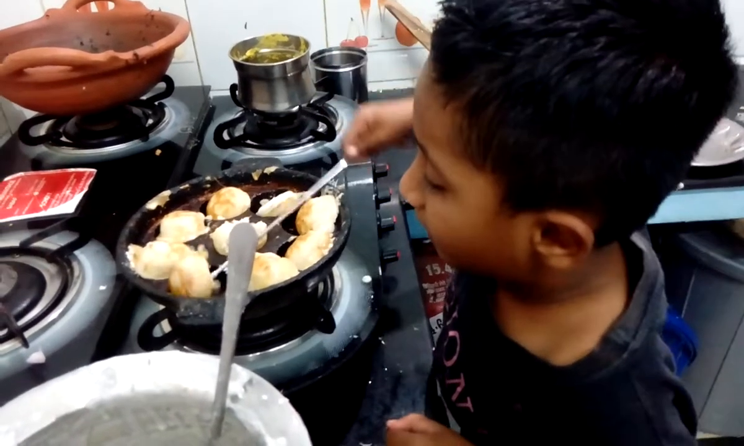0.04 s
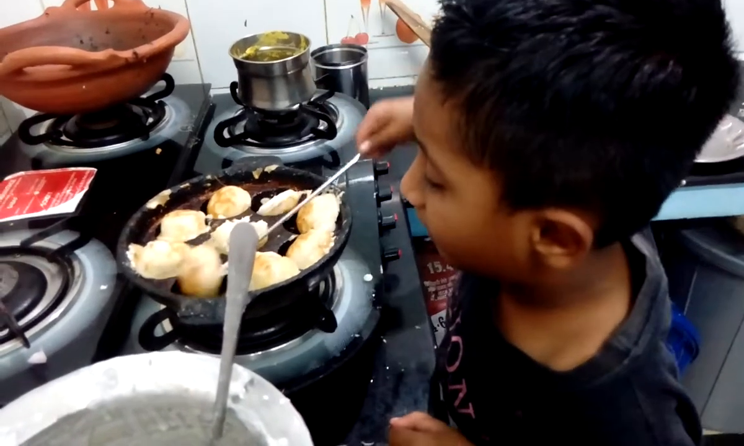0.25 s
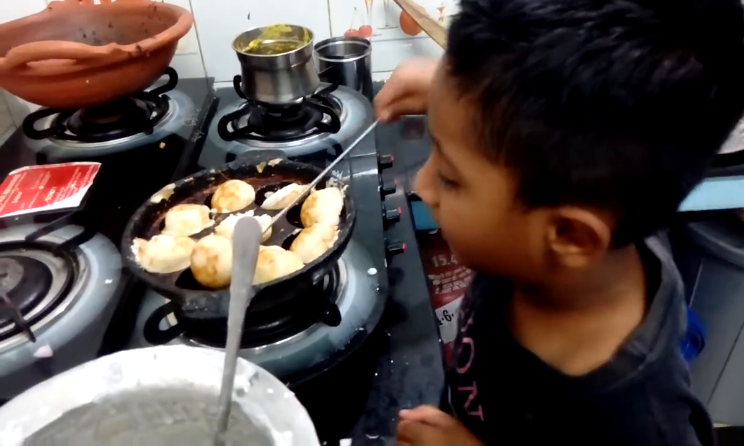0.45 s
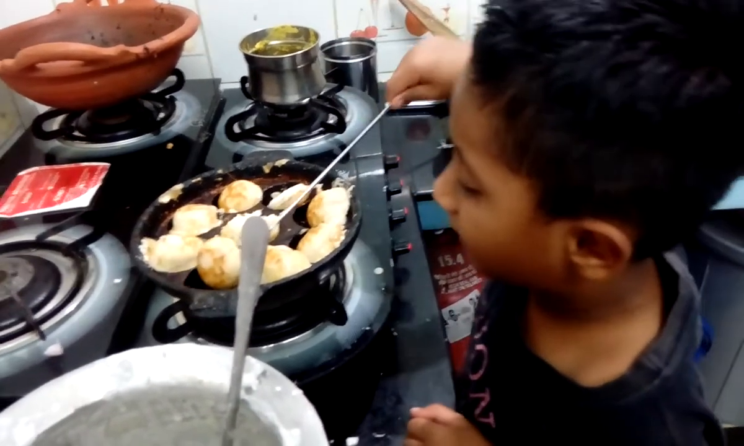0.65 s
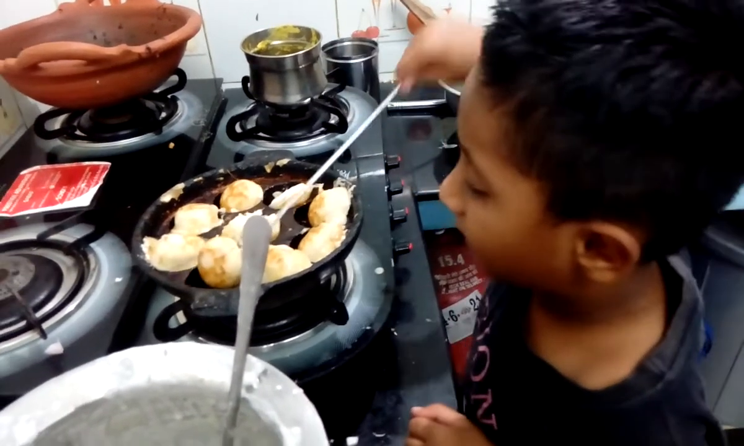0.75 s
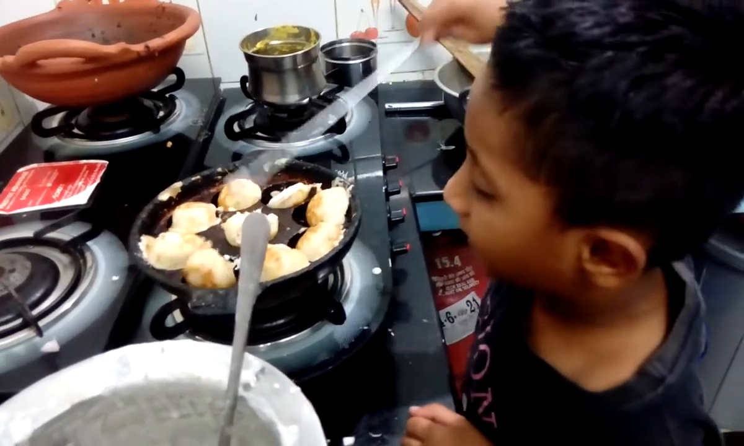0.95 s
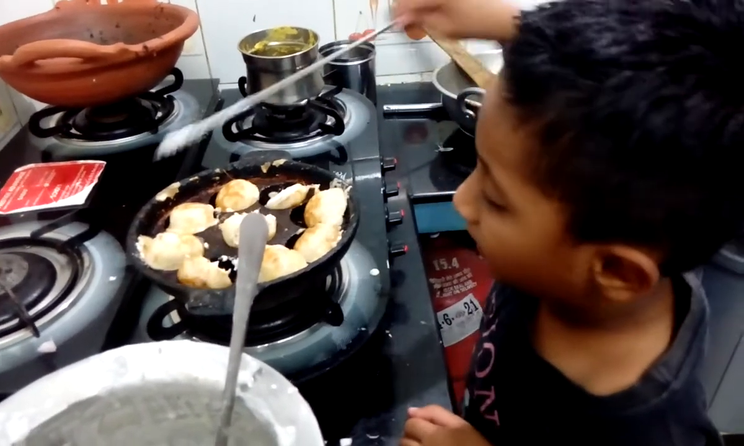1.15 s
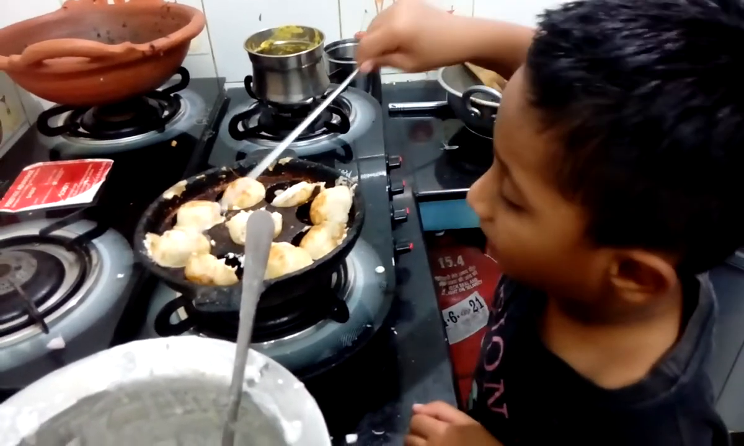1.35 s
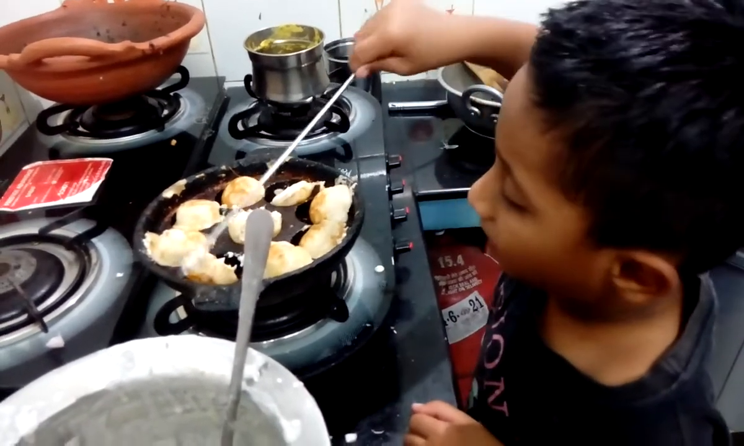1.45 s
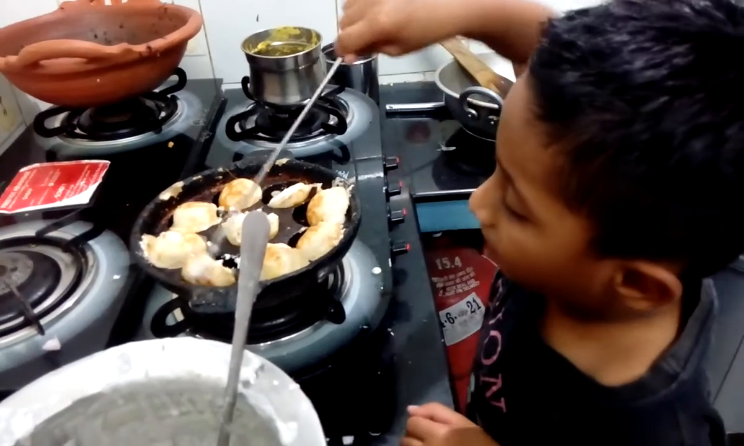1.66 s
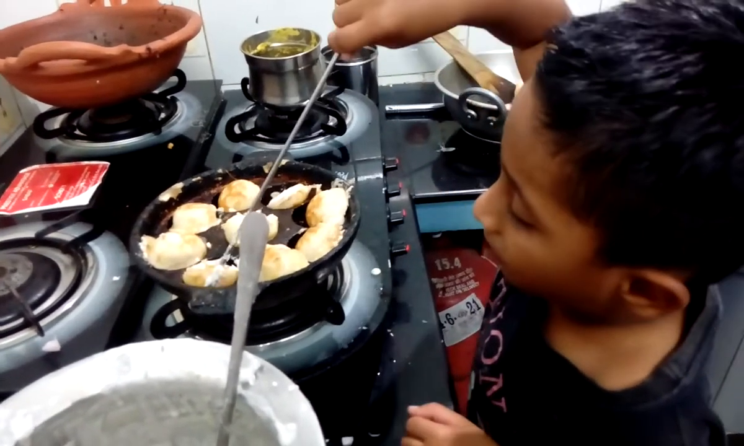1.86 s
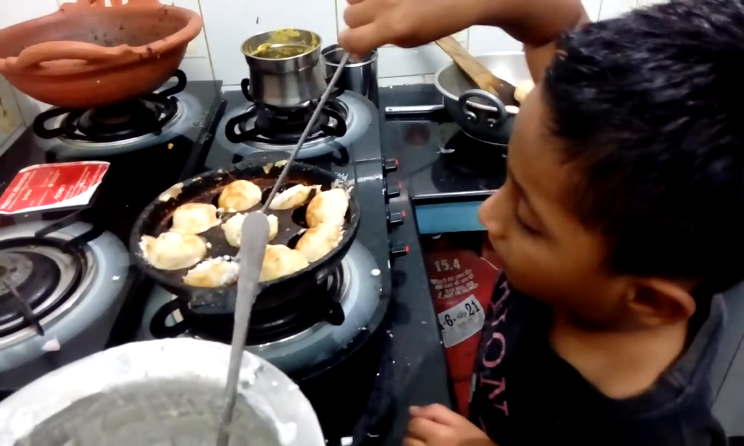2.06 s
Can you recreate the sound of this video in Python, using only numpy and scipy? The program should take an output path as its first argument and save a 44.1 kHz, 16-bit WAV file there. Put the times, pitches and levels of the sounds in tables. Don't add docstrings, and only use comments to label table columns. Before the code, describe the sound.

Three sharp metallic clacks of a skewer on a heavy pan, in a small tiled kitchen.

```python
import sys
import numpy as np
from scipy import signal
from scipy.fft import rfft, irfft
from scipy.io import wavfile
from scipy.ndimage import uniform_filter1d

SR = 44100
rng = np.random.default_rng(int(sys.argv[2]) if len(sys.argv) > 2 else 0)


def invert_db(x):
    u = np.asarray(x, float) / 20
    return 10 ** u


def master_out(mix):
    frames = np.transpose(np.atleast_2d(mix))
    ceiling = np.clip(frames, -1, 1)
    pcm = np.round(ceiling * 32767).astype(np.int16)
    wavfile.write(sys.argv[1], SR, pcm)


N = 92610


def rms(z):
    return np.sqrt(np.mean(abs(z) ** 2))


def evened(x):
    return x / np.sqrt(np.mean(x ** 2) + 1e-20)


def read(points, hz):
    f, value = np.transpose(points)
    return np.interp(np.log(hz + 1), np.log(f + 1), value)


def add(mix, s, sound):
    part = mix[:, round(s * SR):][:, :sound.shape[1]]
    part += sound[:, :part.shape[1]]


def colour(x, db_of):
    db = np.maximum(db_of(abs(np.fft.fftfreq(4096, 1 / SR))), -100)
    spectrum = np.exp(np.conj(signal.hilbert(np.log(invert_db(db)))))
    taps = np.fft.ifft(spectrum).real[..., :2048]
    return signal.fftconvolve(x, np.atleast_2d(taps), axes=1)[:, :x.shape[1]]


def diffuse(count, gain):
    # f/Hz, correlation
    likeness = [(60, 1), (150, 0.57), (350, 1), (650, 0.21), (1100, -0.12), (2400, 0.12), (6000, -0.037),
                (15000, -0.0063)]
    frames = count // 128 + 6
    hz = np.fft.rfftfreq(512, 1 / SR)[:, None]
    a, b, c, d = rng.standard_normal((frames, 257, 4)).T
    same = np.clip(read(likeness, hz), -1, 1)
    left = a + 1j * b
    right = same * left + np.sqrt(abs(1 - same ** 2)) * (c + 1j * d)
    z = np.array([left, right]) * gain(hz, np.arange(frames) * 128 / SR)
    return signal.istft(z, nperseg=512, noverlap=384)[1][:, :count]


def hiss():
    # f/Hz, density/dB per Hz
    flame = [(20, -27), (87, -4), (300, -8), (900, -9), (2500, -14.5), (3600, -22), (7000, -21.5),
             (15500, -30)]
    # t/s, level/dB, treble/dB
    course = [(0, -57, -1.5), (.18, -52.5, -5.5), (.3, -53.5, 3), (.7, -58.5, -0.5), (1.1, -58.5, -1.5),
              (1.3, -59, 0.5), (1.5, -59, 0), (1.85, -59, 1), (2.1, -60.5, -1)]
    x = evened(diffuse(count=N, gain=lambda hz, s: 1))
    x = evened(colour(x, lambda hz: read(flame, hz)))
    s, db, treble_db = np.transpose(course)
    t = np.arange(N) / SR
    low = signal.sosfiltfilt(signal.butter(2, 3000, fs=SR, output="sos"), x)
    treble = (x - low) * invert_db(np.interp(t, s, treble_db))
    return (low + treble) * invert_db(np.interp(t, s, db))


def fuzzy(seconds, hz, width, steady=0):
    t = np.arange(-.2, seconds, 1 / SR)
    r = np.exp(-np.pi * abs(width) / SR)
    real, imag = rng.standard_normal((2, 2, len(t)))
    noise = real + 1j * imag
    noise = noise + 2.6 * noise[0]
    slow = signal.lfilter([1], np.convolve([1, -r], [1, -r]), noise)
    slow = (1 - steady) * slow / rms(slow) + steady
    keep = t >= 0
    return t[keep], evened((slow * np.exp(2j * np.pi * hz * t)).real[:, keep])


def tone(start, peak, end, hz, db, width):
    t, x = fuzzy(end - start, hz, width, steady=.45 * (width < 24.5))
    swell = np.interp(t, [0, peak - start, end - start], [0, 1, 0])
    cut = round(max(-start, 0) * SR)
    return max(start, 0), (invert_db(db) * x * swell)[:, cut:]


def thud(s, db, hz, length):
    t, x = fuzzy(4 * length, hz, .35 * hz)
    return s, invert_db(db) * x * (1 - np.exp(-t / 0.0056)) * np.exp(-t / length)


def room(direct_db):
    # f/Hz, t60/s
    kitchen = [(200, 0.29), (530, 0.34), (1400, 0.38), (3700, 0.39), (8000, 0.33), (14000, 0.26)]
    # left delay/s, right delay/s, level/dB
    echoes = [(.0007, .0010, -17), (.0022, .0017, -6), (.0029, .0031, -19), (.0043, .0038, -24),
              (.0095, .0102, -19)]
    late_db, late_stretch = -48, 3.9
    bass_build_s, build_s = 0.029, 0.00053

    def decay(hz, s):
        t60 = read(kitchen, hz)
        build = 1 - np.exp(-(s + .001) * (hz + 1) / 300 / bass_build_s)
        return build * (invert_db(-60 * s / t60) + invert_db(late_db - 60 * s / (late_stretch * t60)))

    tail = diffuse(count=30000, gain=decay)
    tail = tail * (1 - np.exp(-np.arange(30000) / SR / build_s))
    early = np.zeros_like(tail)
    early[:, 0] = invert_db(direct_db)
    for k, (left, right, db) in enumerate(echoes):
        early[[0, 1], [round(left * SR), round(right * SR)]] += (-1) ** k * invert_db(db - 3)
    early = signal.lfilter(*signal.butter(1, 1500, "high", fs=SR), early)
    return tail / np.sqrt((tail ** 2).sum(1).mean()) + early


def blow(s, db, lead, graze_db, tint, rings):
    ring_db, near_ring_db, direct_db = -5.5, -14.5, -14.5
    swell_s, spread_s, pair = .004, .0012, .004
    t = np.arange(-.012, .4, 1 / SR)
    after = np.maximum(t, 0)
    graze = invert_db(graze_db - 14) * rng.standard_normal(len(t)) * np.clip(1 + t / lead, 0, 1) * (t < 0)
    crack = 1. * (np.arange(len(t)) == np.argmax(t >= 0))

    ring = np.zeros(len(t))
    for hz, mode_db, t60 in rings:
        t60 = min(t60, max(140 / hz, .035))
        beat = np.cos(np.pi * pair * hz * after)
        ring += invert_db(mode_db - 60 * after / t60) * np.sin(2 * np.pi * hz * after) * beat / np.sqrt(t60)
    ring = ring / np.linalg.norm(ring)

    hit = colour(np.array([crack, graze]), lambda hz: read(tint, hz))
    f = np.fft.rfftfreq(len(t), 2)
    spread = np.exp(-1j * np.pi * spread_s * SR * 8 * f ** 2)
    hit = irfft(rfft(hit) * spread, len(t))
    crack, graze = hit / np.linalg.norm(hit)

    heard = invert_db(near_ring_db) * np.pad(ring * (1 - np.exp(-after / swell_s)), (0, len(t)))
    for x in (crack, graze + invert_db(ring_db) * ring):
        heard = heard + signal.fftconvolve(x[None], room(direct_db), axes=1)[:, :2 * len(t)]
    low_cut = signal.butter(5, 215, "high", fs=SR, output="sos")
    return s - .012, invert_db(db) * 40 * signal.sosfilt(low_cut, heard)


def knock(s, db, hz, rise):
    t = np.arange(0, 8 * rise, 1 / SR)
    swing = np.sin(2 * np.pi * hz * t) * (t / rise * np.exp(1 - t / rise)) ** 2
    return s, invert_db(db) * np.array([[1], [.8]]) * swing


def tick(s, db, pan_db):
    # f/Hz, level/dB
    pop = [(200, -50), (1000, -14), (3000, 0), (6000, 9), (9000, 0), (12000, 9), (16000, 0)]
    faint = np.r_[1, invert_db(-9) * np.ones(29999)]
    click = colour(room(0.0) * faint, lambda hz: read(pop, hz))
    return s, invert_db(db - 2) * invert_db([[pan_db / 2], [-pan_db / 2]]) * click


def scene():
    # start t/s, peak t/s, end t/s
    spans = [(-.5, .3, .6), (.48, .52, .95), (.85, .96, 1.03), (.57, .6, .66), (1.09, 1.13, 1.19),
             (-.05, .4, .7), (1.455, 1.5, 1.575), (.568, .6, .65), (.36, .45, .54), (1.57, 1.63, 1.74),
             (1.6, 1.7, 1.78), (.74, .84, .92), (2.07, 2.1, 2.13)]
    # f/Hz, level/dB, width/Hz
    tones = [(843, -59, 20), (908, -57.5, 22), (893, -61, 24), (12500, -74, 2600), (12000, -71, 2500),
             (77, -58, 9), (5850, -60, 230), (6800, -63, 2200), (35, -68, 25), (40, -67, 30),
             (110, -63, 40), (170, -58, 60), (850, -58, 300)]
    # t/s, level/dB, f/Hz, length/s
    thuds = [(.083, -53, 840, .012), (.65, -50, 370, .035), (1.155, -43, 345, .022), (1.165, -52, 600, .02),
             (1.195, -52, 480, .025), (1.89, -56, 290, .04), (1.955, -53, 310, .03)]
    # t/s, level/dB, graze lead/s, graze level/dB
    blows = [
        (0.2087, -19, 0.0071, -31),
        (0.738, -21, 0.054, -35.5),
        (1.5755, -21, 0.0067, -8.5),
    ]
    # f/Hz, density/dB per Hz
    colours = [
        [(190, -20), (270, 1.3), (600, -2), (1200, -2.5), (2400, -5.5), (4500, -10), (8000, -8.5), (14500, -14)],
        [(185, -25), (270, -9), (600, -9), (1200, -7.5), (2400, -6.5), (4500, -10.5), (8000, -9.5),
         (14500, -18.5)],
        [(185, -26), (270, -5.5), (600, -2), (2000, -2), (3200, -10.5), (4500, -7), (8000, -8.5), (14500, -15)],
    ]
    # f/Hz, level/dB, t60/s
    modes = [
        [(269.7, -6.5, 0.23), (310, -10.5, 0.052), (370, -12, 0.13), (500, -14, 0.14), (932, -7, 0.26),
         (1097, -7.5, 0.13), (1946, -4.5, 0.12), (2278, -3.5, .04), (2398, -2.5, .05), (2542, -2, 0.068),
         (4335, 0, 0.02), (7030, -6, 0.042), (12000, -5, 0.066), (13440, -6, 0.056)],
        [(256, -18.5, 0.28), (276.5, -4.5, 0.16), (316, 0, 0.057), (518, -9, 0.13), (570, -10.5, 0.15),
         (1230, -7, 0.16), (1926, -4, 0.095), (2360, -5, 0.06), (4180, -24, .05), (5480, 4.5, 0.03),
         (7040, -2, 0.027), (10600, -5, .04), (11640, -24, 0.05), (13100, 1.5, 0.026)],
        [(266, 0, 0.13), (293, 0, .13), (478, -11, 0.15), (520.7, 8, 0.1), (571.5, -7, 0.17), (914, 3, 0.19),
         (1290, -15, 0.081), (1952, 1.5, 0.025), (2574, -1.5, 0.088), (3780, -19, 0.04), (4350, 0.5, 0.025),
         (5410, -1.5, 0.05), (7240, -18, .05), (12760, -8, 0.05)],
    ]
    # t/s, level/dB, f/Hz, time to peak/s
    knocks = [(0.2079, -25.5, 310, .006), (.249, -30.5, 291, 0.0063), (0.7395, -35.5, 297, 0.0053),
              (.772, -32.5, 518, 0.0089), (1.575, -30.5, 281, 0.0079), (0.2092, -20, 2490, 0.0026),
              (.742, -35, 1208, 0.0033), (1.578, -25.5, 1317, 0.007)]
    # t/s, peak level/dB, pan/dB
    ticks = [(.5681, -39, 4), (1.0929, -45, 6), (1.1104, -44, 5), (1.2875, -41, 4), (1.3688, -45, 5),
             (1.4222, -47, 3), (1.8497, -40, 5)]
    mix = hiss()
    for row, tint, rings in zip(blows, colours, modes):
        add(mix, *blow(*row, tint, rings))
    for source, rows in ((tone, np.c_[spans, tones]), (thud, thuds), (knock, knocks), (tick, ticks)):
        for row in rows:
            add(mix, *source(*row))
    return mix


def thin(x):
    hz, _, z = signal.stft(x, SR, nperseg=1024)
    hz = hz[:, None]
    power = (abs(z) ** 2).mean(0) + 1e-20
    bands = 10 * np.log10(power[:512].reshape(64, 8, -1).mean(1))
    luck = evened(uniform_filter1d(rng.standard_normal(bands.shape), size=4, axis=1))
    bands, luck = np.repeat(bands, 8, axis=0), np.repeat(luck, 8, axis=0)
    level = 10 * np.log10(power.sum(0))
    loudness = np.maximum(level - np.median(level), 0)

    rise = (1.8 + .08 * loudness) * (hz[:512] > 8500)
    floor = uniform_filter1d(bands, size=120, axis=0) - 6.8 + rise + 1.8 * luck
    keep = (bands > floor) | (hz[:512] < 3400)
    attack = np.diff(level, prepend=0) > 19
    top = np.where(attack, 16000, 15550 - 16 * loudness)
    keep = np.r_[keep, keep[-1:]] / (1 + (hz / top) ** 150)
    return signal.istft(z * keep, SR, nperseg=1024)[1][:, :N]


def low_pass(x):
    return signal.sosfilt(signal.butter(12, 16460, fs=SR, output="sos"), x)


def record(dry):
    # f/Hz, width/Hz, level/dB
    bumps = [(1570, 116, -4.5), (3760, 110, -1.5), (4830, 126, -8), (6437, 188, -8.5), (6760, 420, 4),
             (8984, 230, -4), (9790, 250, -8), (11260, 80, -4.5), (12410, 1320, 6), (13800, 250, -3)]
    # f/Hz, left minus right/dB
    tilt = [(60, 3), (150, -1), (640, 2.5), (1400, -2), (3100, -2), (6800, 4), (10000, 5.5), (13000, -1.5)]

    def response(hz):
        body = sum(db * np.exp(-((hz - f) / width) ** 2 / 2) for f, width, db in bumps)
        return body + np.array([[.5], [-.5]]) * read(tilt, hz)

    return low_pass(thin(colour(dry, response)))


dry = scene()
out = record(dry)
master_out(out)
```